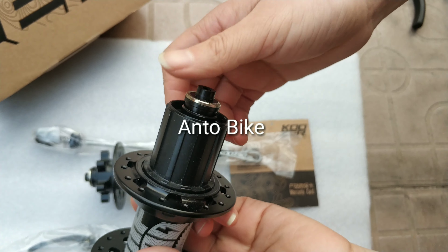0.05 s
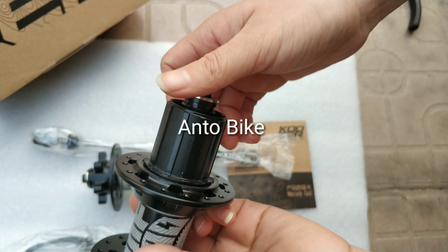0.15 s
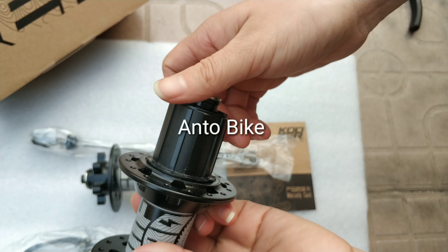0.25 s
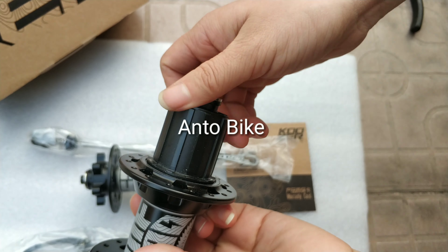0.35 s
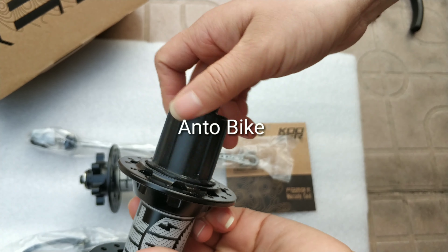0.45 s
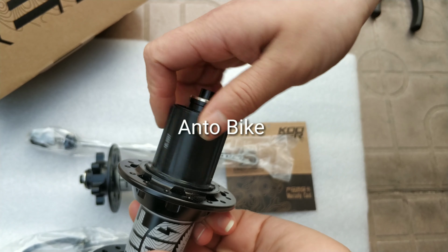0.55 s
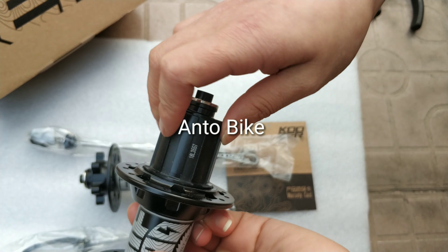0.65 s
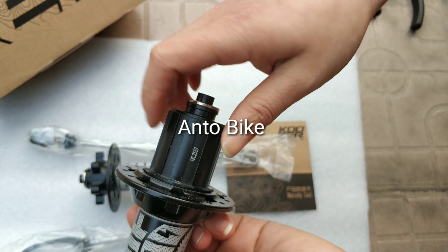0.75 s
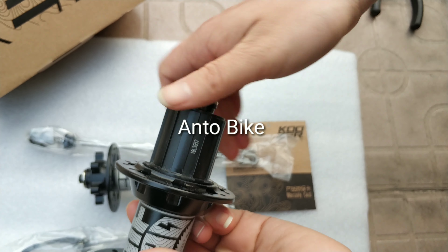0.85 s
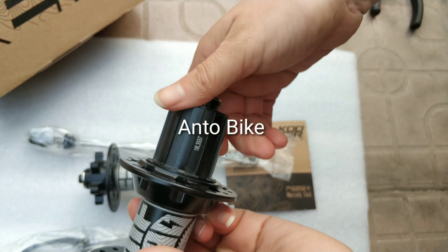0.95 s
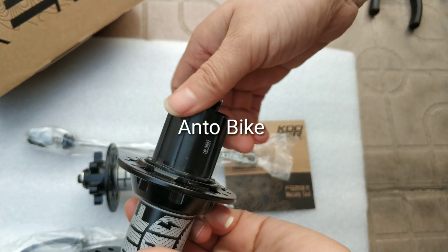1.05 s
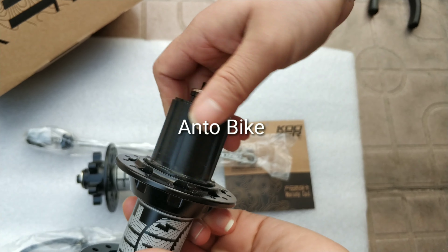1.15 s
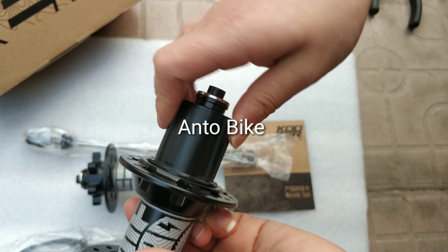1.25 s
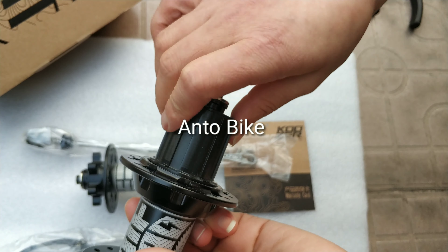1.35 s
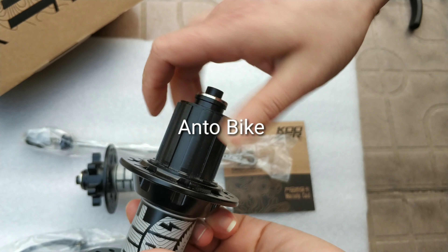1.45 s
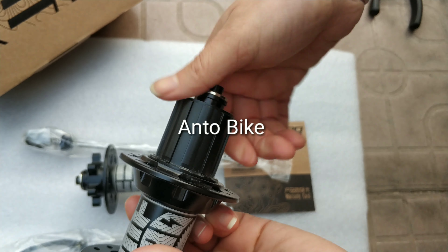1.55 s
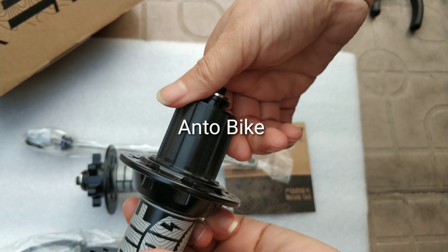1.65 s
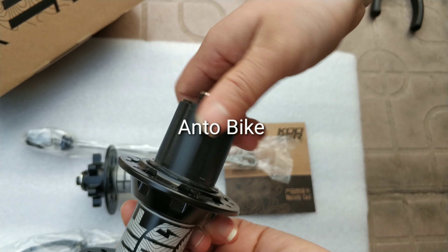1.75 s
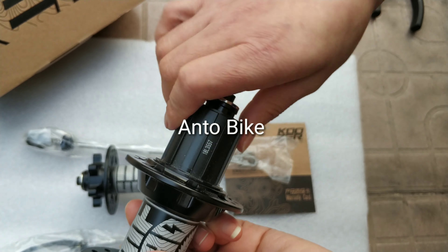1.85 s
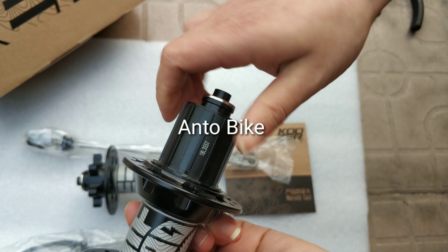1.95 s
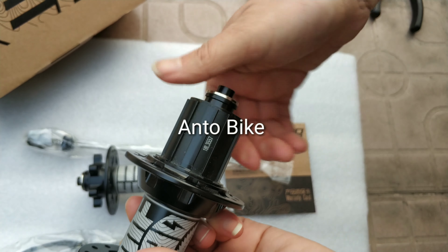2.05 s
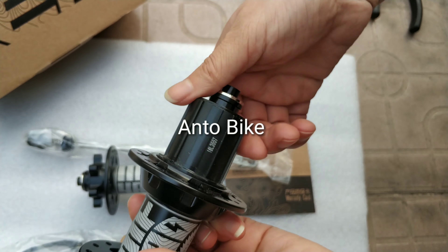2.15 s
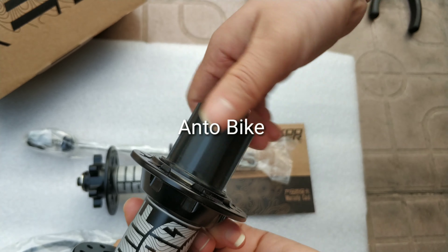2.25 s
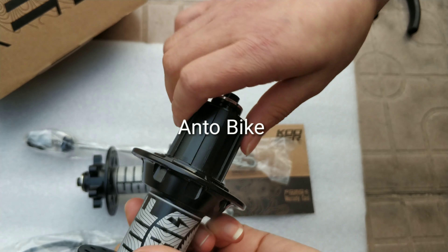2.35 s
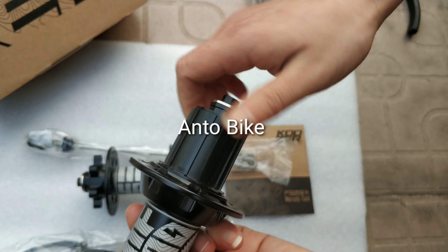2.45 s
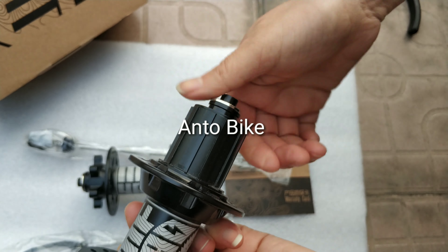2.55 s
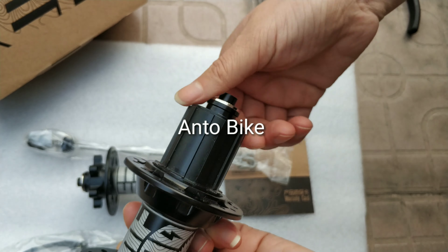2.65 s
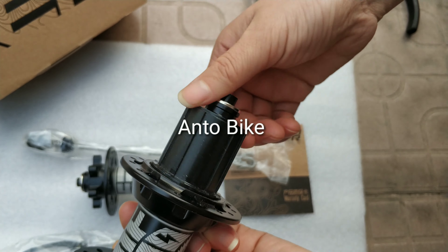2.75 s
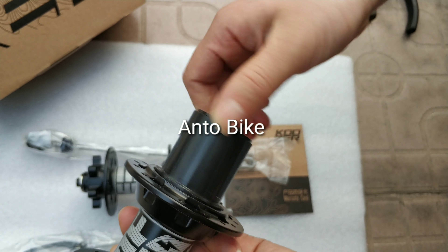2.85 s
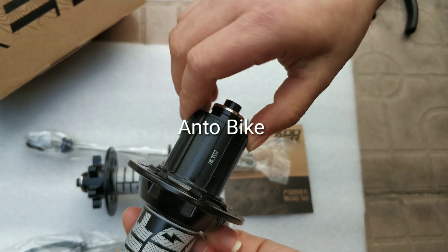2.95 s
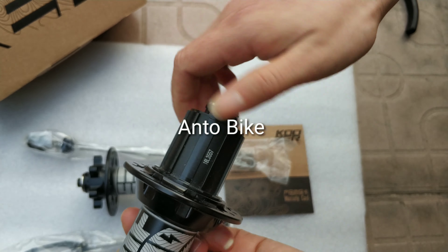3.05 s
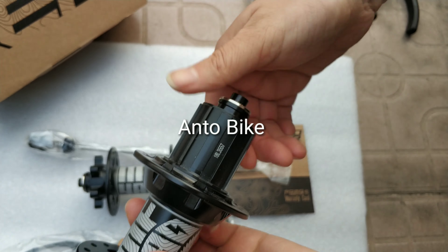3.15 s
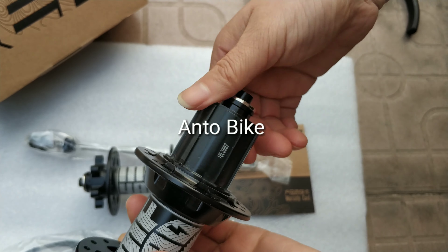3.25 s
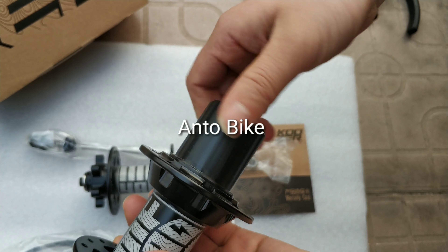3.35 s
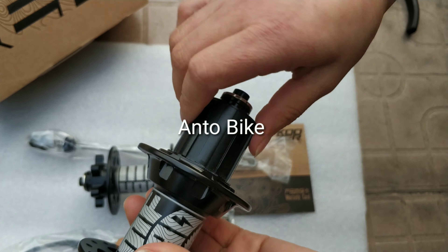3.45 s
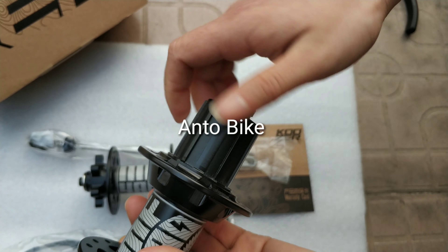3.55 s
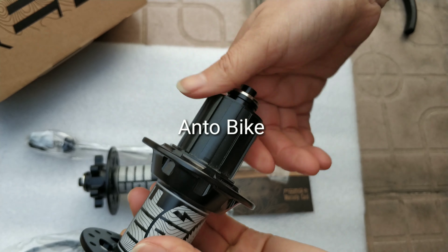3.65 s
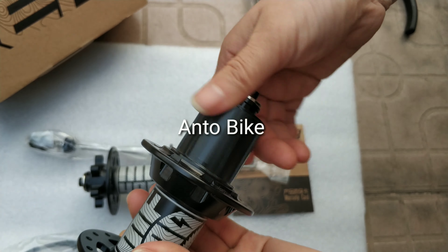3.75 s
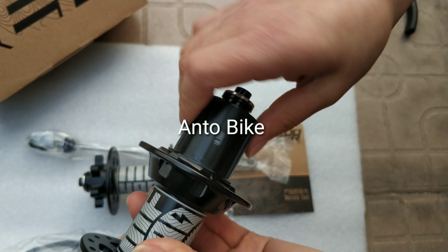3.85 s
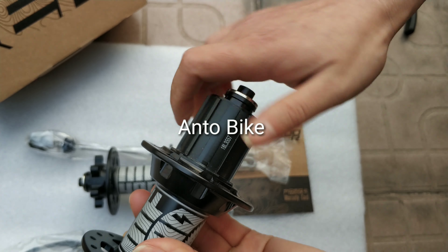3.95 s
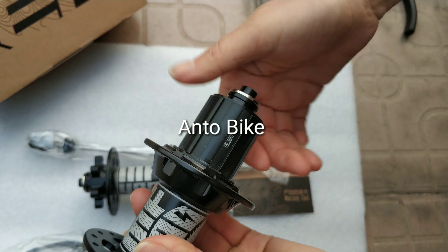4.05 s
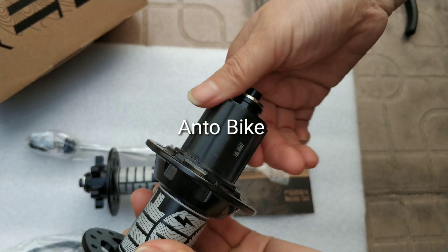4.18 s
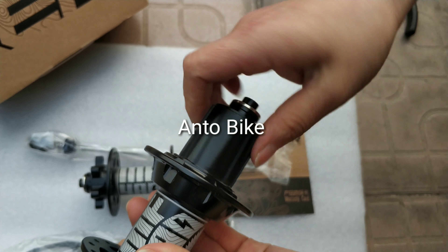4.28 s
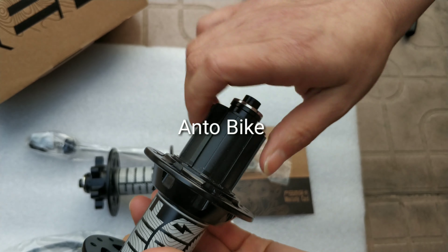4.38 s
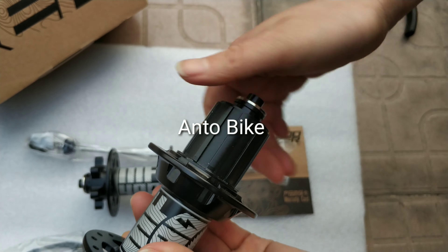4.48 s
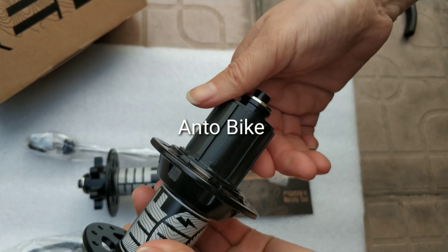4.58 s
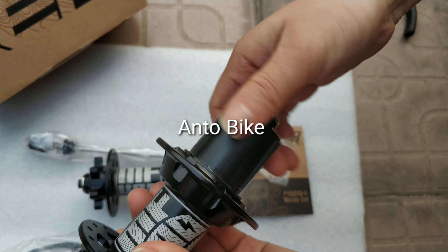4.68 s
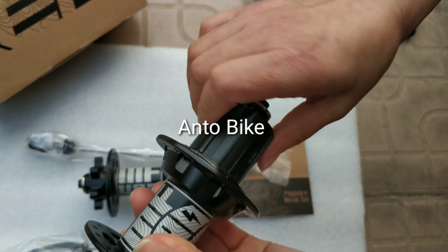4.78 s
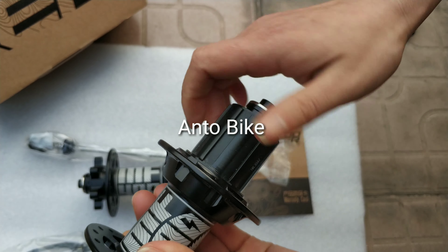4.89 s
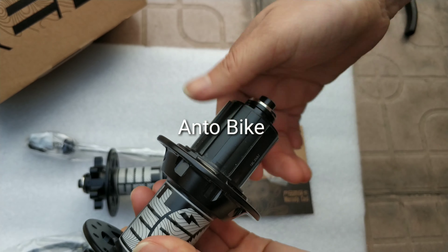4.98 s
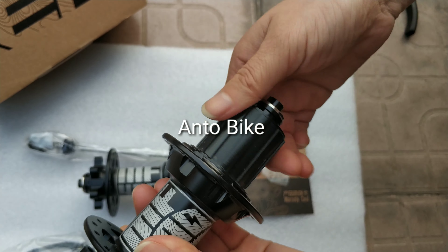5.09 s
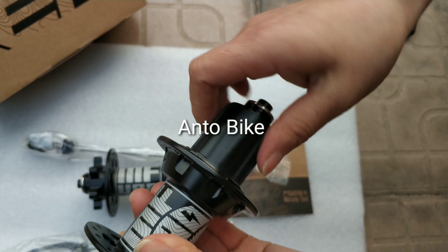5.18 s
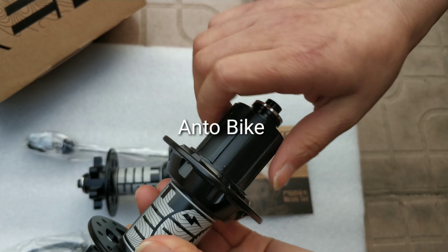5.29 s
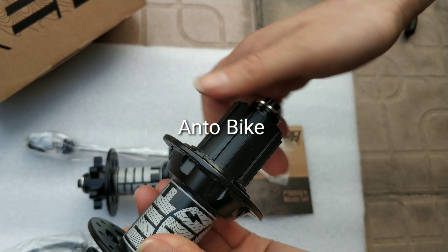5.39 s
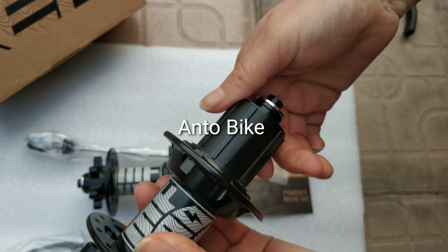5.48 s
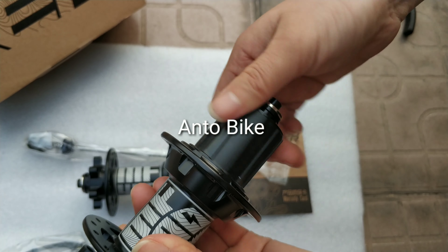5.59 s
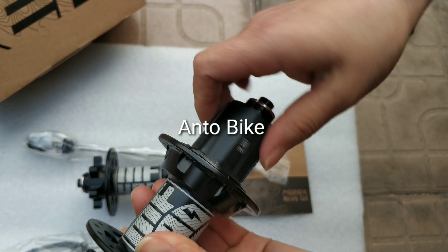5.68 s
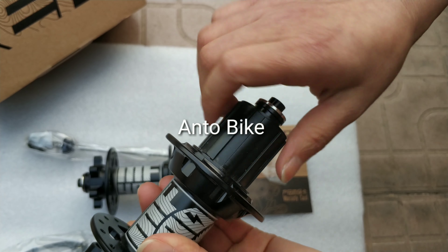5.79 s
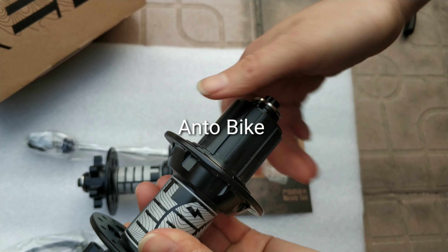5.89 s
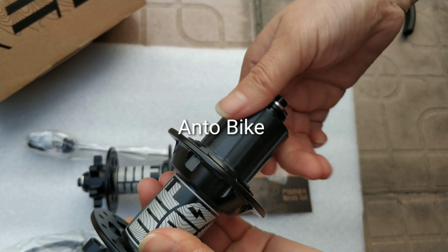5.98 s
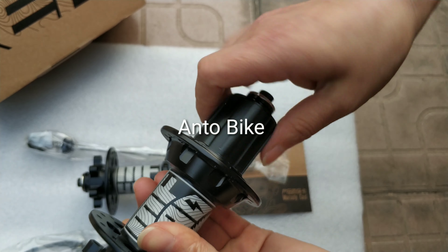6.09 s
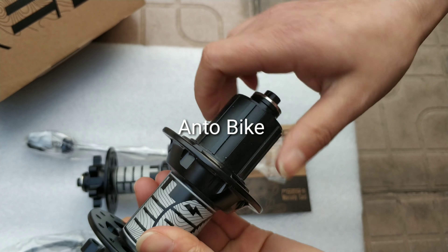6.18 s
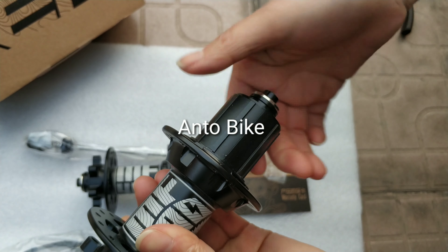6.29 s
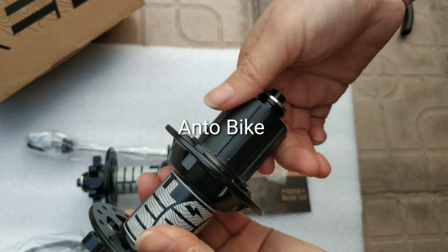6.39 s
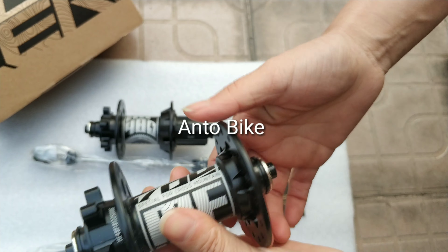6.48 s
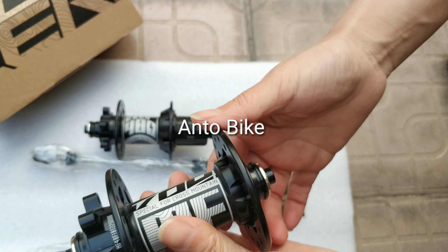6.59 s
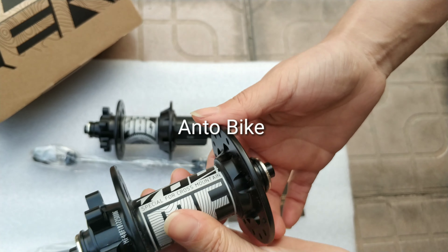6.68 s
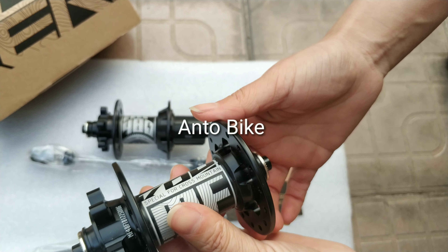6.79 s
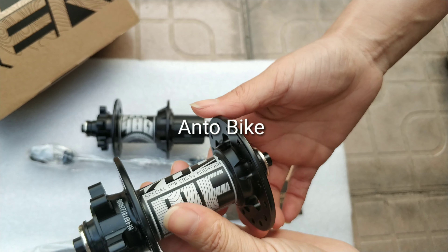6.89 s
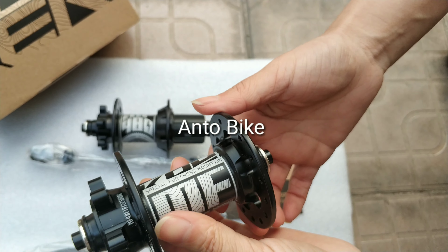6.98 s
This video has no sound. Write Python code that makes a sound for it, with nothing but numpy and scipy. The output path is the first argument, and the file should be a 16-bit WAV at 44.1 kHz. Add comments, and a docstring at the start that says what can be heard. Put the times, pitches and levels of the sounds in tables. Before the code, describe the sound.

After a quiet half second of low traffic murmur, a bicycle freehub is flicked by hand again and again. Each flick is a quick zip of about ten bright, dry pawl snaps with a duller knock of the shell and a brief high steel ring. The bursts stop just after six seconds, leaving soft handling ticks and one faint metal ting. Close microphone, small space.

```python
"""A bicycle rear hub, held close, clicks in short flicks as a hand twists its freehub body, speeds it up and brakes.
At every ratchet tooth the sprung pawls snap down almost together, knock the shell and set the steel ringing.
Shaped noise makes the snaps and knocks; fading sine tones make the ring and one faint metal ting.
Fingers make a few faint ticks of noise, and a small room answers with a short tail of fading noise.
Behind it all, coloured noise makes the low murmur of distant traffic."""
import sys
import numpy as np
from scipy import signal
from scipy.fft import rfft, irfft, next_fast_len
from scipy.io import wavfile
from scipy.ndimage import uniform_filter1d, map_coordinates

SR = 44100
rng = np.random.default_rng(int(sys.argv[2]) if len(sys.argv) > 2 else 0)


def master_out(mix):
    """Clip the mix to full scale and print it as 16-bit PCM to the path in sys.argv[1]."""
    frames = np.transpose(np.atleast_2d(mix))
    ceiling = np.clip(frames, -1, 1)
    pcm = np.round(ceiling * 32767).astype(np.int16)
    wavfile.write(sys.argv[1], SR, pcm)


N = 310044  # samples in the whole scene
CLICK, LEAD = 5120, 176  # samples: length of one click, and the scrape before its pawls land

# colour of a pawl's snap, also used for a finger's brush: f/Hz, relative level per Hz/dB
SNAP_COLOUR = [(300, -83), (2500, -52.5), (4000, -27), (4800, -17.5), (5600, -10), (6200, -12.5),
               (7100, -10.5), (7900, -2), (8400, -2.5), (9050, 2), (9600, -5), (10100, -13.5), (10700, -29),
               (11500, -52.5)]


def amp(db):
    """Turn decibels into a gain."""
    return 10 ** (np.asarray(db) / 20)


def unit(x):
    """Scale a sound to rms 1."""
    return x / np.sqrt(np.mean(x ** 2) + 1e-20)


def along(points, hz):
    """Read a value between (f/Hz, value) points, on a log frequency axis."""
    f, value = np.transpose(points)
    return np.interp(np.log(hz + 1), np.log(f + 1), value)


def curves(rows):
    """Draw straight lines between rows: one value per sample for each column after the time."""
    s, *columns = np.transpose(rows)
    return [np.interp(np.arange(N) / SR, s, column) for column in columns]


def wobble(rate):
    """Make a smooth random curve through `rate` random points a second."""
    points = rng.standard_normal(int(N * rate / SR) + 4)
    return map_coordinates(points, [np.arange(N) * rate / SR])


def filtered(x, response):
    """Multiply the spectrum of x by a response that depends on frequency."""
    size = next_fast_len(N + SR // 2)
    spectrum = rfft(x, size) * response(np.fft.rfftfreq(size, 1 / SR))
    return irfft(spectrum, size)[:N]


def rush(colour, patchy_db):
    """Make coloured noise of rms 1 whose gain varies in patches over time and frequency."""
    z = signal.stft(rng.standard_normal(N), nperseg=1024)[2]
    patches = uniform_filter1d(rng.standard_normal(z.shape), size=5, axis=0)
    patches = uniform_filter1d(patches, size=7, axis=1)
    noise = signal.istft(z * amp(patchy_db * unit(patches)), nperseg=1024)[1][:N]
    return unit(filtered(noise, lambda hz: amp(along(colour, hz))))


def street():
    """Distant traffic: a throbbing low rumble, and a wider wash of noise that swells now and then."""
    # swells of traffic: t/s, rumble level/dB before its throb, wash level/dB before its lift
    traffic = [(0, -56.5, -64), (.5, -53.5, -60), (.9, -57, -64.5), (1.5, -57, -63), (2.6, -56.5, -64),
               (3.3, -54.5, -62), (3.7, -51.5, -57.5), (4, -54.5, -55), (4.35, -56.5, -63.5),
               (7.03, -60.5, -64)]
    # colour of the low rumble: f/Hz, relative level per Hz/dB
    rumble_colour = [(40, -45.5), (65, -36), (90, -27.5), (115, -15), (135, -15), (165, -2), (200, 1),
                     (240, -3), (290, -8.5), (400, -13), (600, -23.5), (1500, -57)]
    # colour of the wash: f/Hz, relative level per Hz/dB
    wash_colour = [(150, -39), (400, -4.5), (700, 2), (1300, -1), (1800, -5.5), (2600, -6.5), (4500, -11.5),
                   (7000, -17), (9500, -11.5), (10200, -25.5), (10900, -45)]
    rumble_db, wash_db = curves(traffic)
    throb_db = 1.3 * wobble(11)
    rumble = amp(rumble_db + throb_db) * rush(rumble_colour, patchy_db=3.0)
    wash = amp(wash_db + 0.8) * rush(wash_colour, patchy_db=3.2)
    return rumble + wash


def teeth():
    """Each twist speeds up, runs and brakes; gives every tooth's time/s, snap/dB and knock/dB."""
    # one row per twist: first tooth t/s, last tooth t/s, teeth passed, slowness at the start,
    # teeth to get up to speed, slowness at the stop, snap level at the start/dB,
    # fall of the snap by the stop/dB, shell knock level/dB (levels before scatter and a fixed lift);
    # slowness is the extra time a tooth takes, in multiples of its time at full speed
    twists = [(0.49, 0.7202, 9, 3.9, 4.0, 3.9, -22.2, 5.1, -39.4),
              (1.113, 1.381, 11, 4.9, 3.8, 3.1, -25.3, 2.1, -40.2),
              (1.7239, 1.8882, 12, 3.9, 5.6, 2.2, -23.1, 5.4, -40.1),
              (2.2303, 2.419, 13, 2.2, 2.9, 2.7, -24.6, 1.8, -40.1),
              (2.759, 2.803, 2, 0.0, 1.0, 0.0, -29.5, 0, -41.5),
              (2.8526, 2.9773, 9, 0.4, 0.6, 0.3, -25.0, 0.5, -40.3),
              (3.315, 3.495, 11, 1.8, 1.4, 0.6, -22.8, 4.0, -36.8),
              (3.786, 3.9207, 12, 1.2, 2.3, 0.5, -24.5, 0.8, -39.1),
              (4.2036, 4.3589, 13, 1.7, 1.6, 0.6, -23.8, 4.4, -40.4),
              (4.677, 4.8315, 12, 1.7, 1.1, 1.0, -22.5, 4.3, -39.9),
              (5.1552, 5.2768, 11, 1.0, 1.6, 0.4, -19.9, 9.5, -38.6),
              (5.6024, 5.7522, 13, 3.6, 1.7, 0.9, -22.2, 2.8, -38.9),
              (6.0132, 6.157, 12, 2.0, 1.0, 1.7, -20.9, 7.5, -40.0)]
    brake_teeth = .8  # the hand brakes over about this many teeth
    jitter_s = .0004  # rms at full speed: the fingers never turn quite evenly
    snap_scatter_db, knock_scatter_db = 3.5, 2.0  # rms from tooth to tooth; the snap's is at full speed
    steady_share = 0.38  # a very slow tooth keeps this share of the snap's scatter
    knock_ease_db = 1  # the knock is this much weaker at either end of a twist than in its middle
    passed = []
    for start, stop, count, slow_start, run_up, slow_stop, snap_db, fade_db, knock_db in twists:
        k = np.arange(round(count) - 1)
        speeding_up = slow_start * np.exp(-k / run_up)
        braking = slow_stop * np.exp(-k[::-1] / brake_teeth)
        gaps = 1 + speeding_up + braking
        progress = np.append(0, np.cumsum(gaps)) / gaps.sum()
        speed = np.append(0, gaps.min() / gaps)  # 1 at the fastest tooth
        luck = rng.uniform(-1, 1, (len(progress), 3)) * np.sqrt(3)  # rms 1
        late, snap_luck, knock_luck = luck.T
        uneven_db = snap_scatter_db * (steady_share + (1 - steady_share) * speed) * snap_luck
        s = start + (stop - start) * progress + jitter_s * late * speed
        snaps_db = snap_db - fade_db * progress ** 2 + uneven_db - uneven_db.mean()
        ease_db = knock_ease_db * (2 * progress - 1) ** 2
        passed.append([s, snaps_db, knock_db - ease_db + knock_scatter_db * knock_luck])
    return np.hstack(passed)


def landings(count, uneven_db, scrape_db, chatter_db, chatter_t60):
    """Force at each tooth: the pawls scrape over the crest, land one just after another and chatter."""
    gaps = rng.uniform(.0002, .0009, (count, 6))  # seconds between six landings
    delay = np.cumsum(gaps, axis=1) - gaps[:, :1]
    # later landings are weaker: 60 dB down after 14 ms
    size = amp(uneven_db * rng.standard_normal(delay.shape) - 60 * delay / .014)
    t = (np.arange(CLICK) - LEAD) / SR
    scrape = amp(scrape_db + 60 * np.minimum(t, 0) / .012)  # rises towards the landing
    chatter = amp(chatter_db - 60 * np.maximum(t, 0) / chatter_t60)
    force = rng.standard_normal((count, CLICK)) * np.where(t < 0, scrape, chatter)
    landing_sample = LEAD + (delay * SR).astype(int)
    np.add.at(force, (np.arange(count)[:, None], landing_sample), size)
    return force


def struck(blows, gain):
    """Colour blows with a filter that never sounds ahead of its blow; each comes out with energy 1."""
    # folding the cepstrum turns the bare gain into a minimum-phase filter
    cepstrum = irfft(np.log(np.maximum(gain, 1e-6)))
    cepstrum[..., 1:CLICK // 2] *= 2
    cepstrum[..., CLICK // 2 + 1:] = 0
    clicks = irfft(rfft(blows) * np.exp(rfft(cepstrum)))
    return clicks / np.linalg.norm(clicks, axis=1, keepdims=True)


def ring(count, modes, detune_hz):
    """Steel tones swell in about a millisecond and die away; pitch and strength shift at each blow."""
    t = np.maximum(np.arange(CLICK) - LEAD, 0) / SR
    tone = 0
    for hz, db, t60 in modes:
        shift, strength = rng.standard_normal((count, 2)).T[..., None]
        level = amp(db + 2.1 * strength - 60 * t / t60)
        tone = tone + level * np.sin(2 * np.pi * (hz + detune_hz * shift) * t)
    return tone * (1 - np.exp(-t / .0006))


def placed(times, clicks, db):
    """Lay each click at its level, starting LEAD samples before its time."""
    index = np.round(times * SR).astype(int)[:, None] + np.arange(CLICK) - LEAD
    levelled = clicks * amp(db)[:, None]
    return np.bincount(index.ravel(), levelled.ravel(), N)[:N]


def ratchet():
    """Every tooth gives a bright snap, a duller knock of the shell and a push to the ringing steel."""
    # the grip decides which part rings freely: t/s, ratchet ring level/dB, freehub body level/dB
    # (both relative to the snap level)
    grip = [(.6, -11, 4.5), (1.3, -3, 6.5), (2.4, 1, 8), (3.8, -2, 4.5), (4.75, 3, 0), (5.2, 0, 0),
            (5.7, 0, 0), (6.1, 2, -3)]
    # ringing ratchet: f/Hz, level/dB, time to fall 60 dB/s (levels vary from tooth to tooth)
    ratchet_modes = [(5205, -13.5, .085)]
    # ringing freehub body: f/Hz, level/dB, time to fall 60 dB/s
    body_modes = [(5462, -9.5, 0.039), (5680, -19, 0.063)]
    # ringing pawl springs: f/Hz, level/dB, time to fall 60 dB/s
    spring_modes = [(7700, -17.5, 0.022), (8850, -33, .11), (8900, -15.5, 0.034)]
    # dull resonances of the hand-held shell: f/Hz, width/Hz, level before a common lift/dB
    shell_modes = [(695, 180, -4), (1453, 80, -4), (2097, 250, -4.5), (2613, 350, -3), (3272, 220, 1),
                   (4170, 390, -8.5)]
    # colour of the knock under the snap: f/Hz, relative level per Hz/dB
    knock_colour = [(40, -40), (120, -19.5), (400, -11.5), (900, 0.5), (3000, -1.5), (4500, -8.5),
                    (6500, -16), (11000, -62.5)]
    s, snap_db, knock_db = teeth()
    count = len(s)
    hz = np.fft.rfftfreq(CLICK, 1 / SR)
    ring_db, body_db = (curve[(s * SR).astype(int)] for curve in curves(grip))
    force = landings(count, uneven_db=2.5, scrape_db=-19, chatter_db=-23.0, chatter_t60=0.027)
    # a grip that mutes the body leaves a thinner snap, and no two teeth bite alike
    tilt = 2.8 * rng.standard_normal(count) - 0.98 * body_db  # dB per octave well above 1 kHz
    colour = amp(along(SNAP_COLOUR, hz) + tilt[:, None] * np.log2(1 + hz / 1000))
    snaps = placed(s, struck(force, colour), snap_db + 22.5)
    shell = 1
    for centre, width, db in shell_modes:
        shell = shell + amp(db + 12.5) / (1 + (2 * (hz - centre) / width) ** 2)
    knocks = placed(s, struck(force, shell * amp(along(knock_colour, hz))), knock_db + 23.0)
    steel = placed(s, ring(count, ratchet_modes, detune_hz=22), snap_db + ring_db)
    body = placed(s, ring(count, body_modes, detune_hz=80), snap_db + body_db)
    springs = placed(s, ring(count, spring_modes, detune_hz=70), snap_db)
    return snaps + knocks + steel + body + springs


def room(x):
    """A small room answers with a diffuse tail in which each frequency dies at its own speed."""
    # how long the room rings: f/Hz, time to fall 60 dB/s
    echo_times = [(200, 0.1), (2000, 0.16), (6000, 0.18), (10000, 0.082)]
    hz, t, z = signal.stft(rng.standard_normal(SR // 2), SR, nperseg=256)
    fade = amp(-60 * t / along(echo_times, hz)[:, None])
    tail = signal.istft(z * fade, SR, nperseg=256)[1]
    tail = np.pad(tail, (round(.004 * SR), 0))  # the answer starts 4 ms late
    return signal.fftconvolve(x, tail / np.linalg.norm(tail))[:N]


def fingers():
    """Fingers brush the hub: short bursts of noise, coloured like the snap, that die away quickly."""
    # light touches on the hub: t/s, level before a common lift/dB
    touches = [(3.221, -56), (6.335, -57), (6.888, -67.5)]
    s, db = np.transpose(touches)
    fade = amp(-60 * np.arange(CLICK) / SR / 0.045)  # 60 dB down after 45 ms
    brush = rng.standard_normal((len(s), CLICK)) * fade
    colour = amp(along(SNAP_COLOUR, np.fft.rfftfreq(CLICK, 1 / SR)))
    return placed(s, struck(brush, colour), db + 21)


def ting():
    """A light tap as the hub is turned over lets a steel part ring freely."""
    # the tap: t/s, level/dB
    tap = [(7.006, -51)]
    # tones of the ringing part: f/Hz, level/dB before chance shifts it, time to fall 60 dB/s
    ting_modes = [(5810, 0, 0.078), (8527, -9.5, .2), (9114, -6, .15)]
    s, db = np.transpose(tap)
    return placed(s, ring(len(s), ting_modes, detune_hz=0), db)


def scene():
    """Add up the hub close by, the room's answer 13 dB down, and the street."""
    hub = ratchet() + fingers() + ting()
    return (hub + amp(-13) * room(hub) + street())[None]


def record(dry):
    """Cut the treble very steeply above the top frequency."""
    top_hz = 11400
    return filtered(dry[0], lambda hz: 1 / np.sqrt(1 + (hz / top_hz) ** 60))[None]


dry = scene()
out = record(dry)
master_out(out)
```